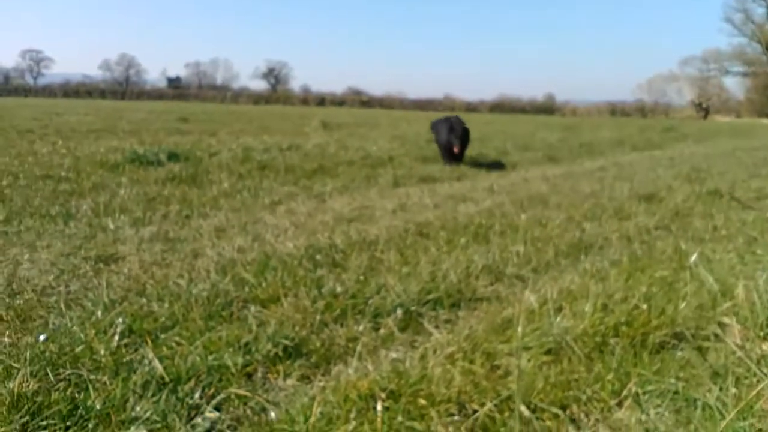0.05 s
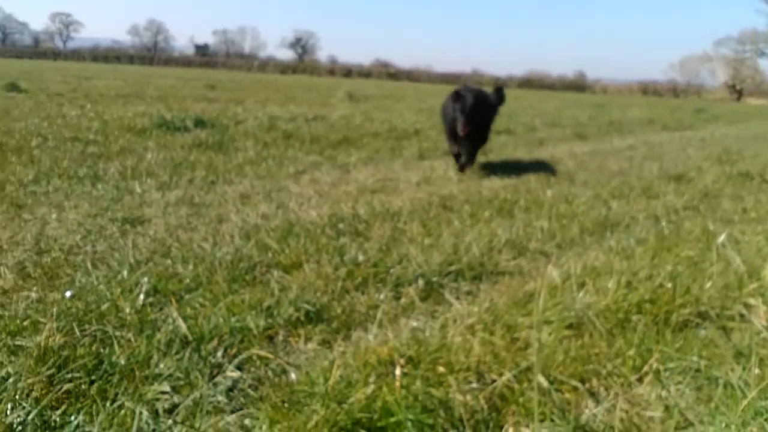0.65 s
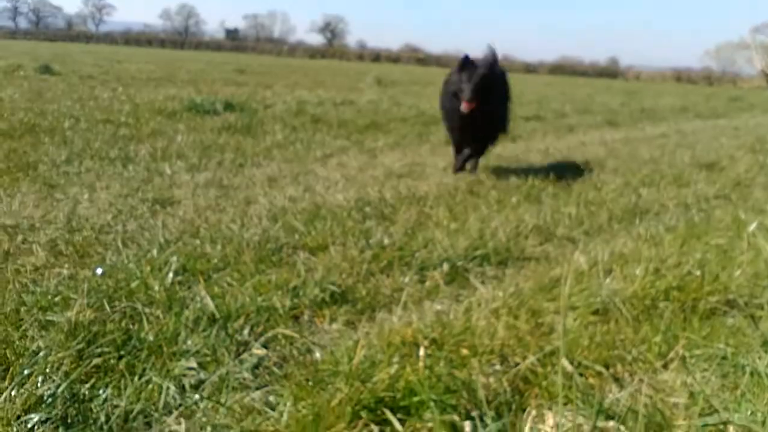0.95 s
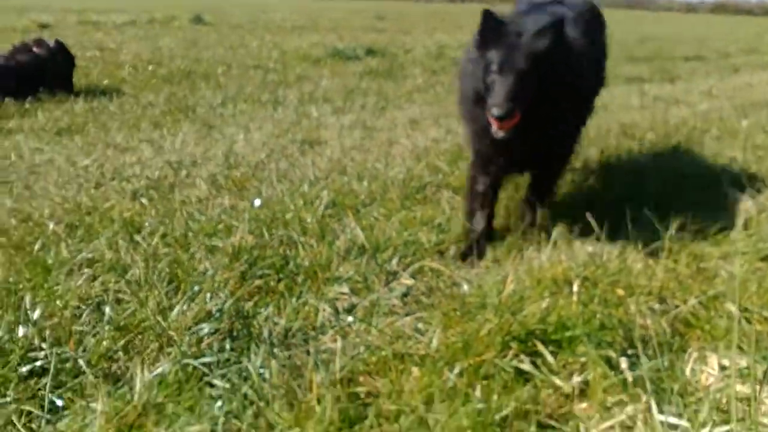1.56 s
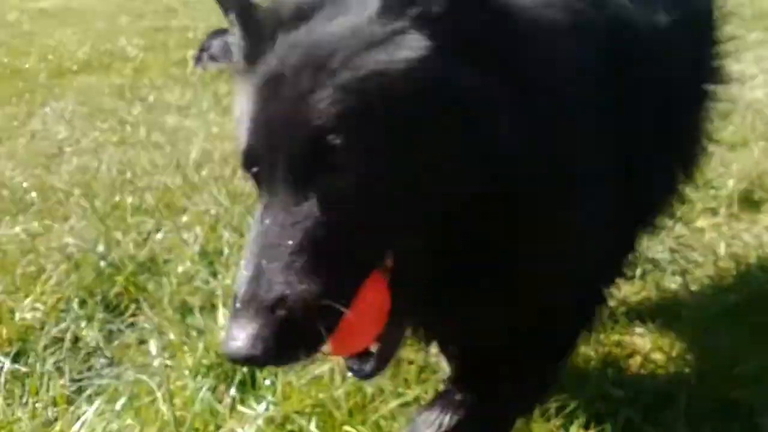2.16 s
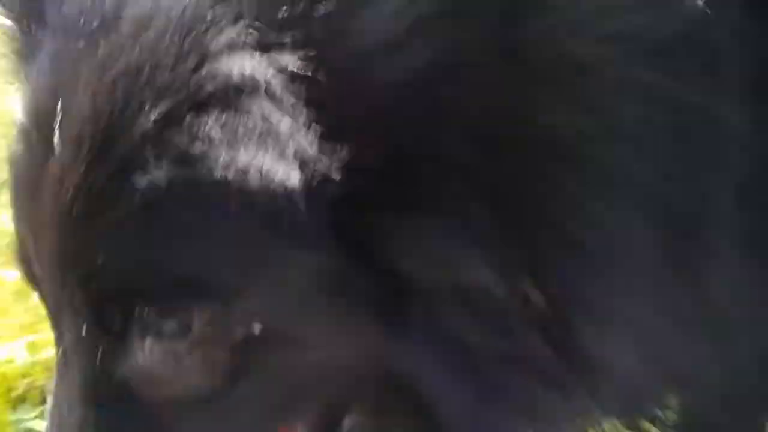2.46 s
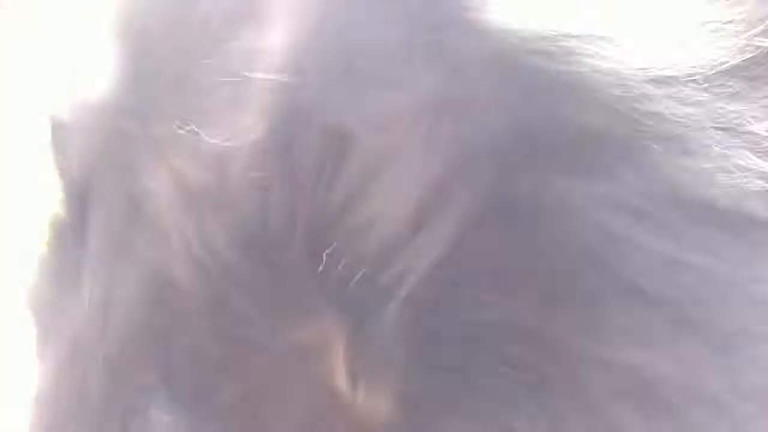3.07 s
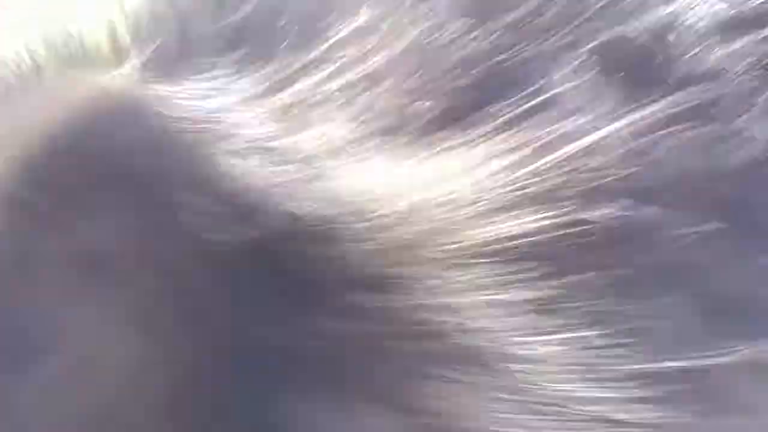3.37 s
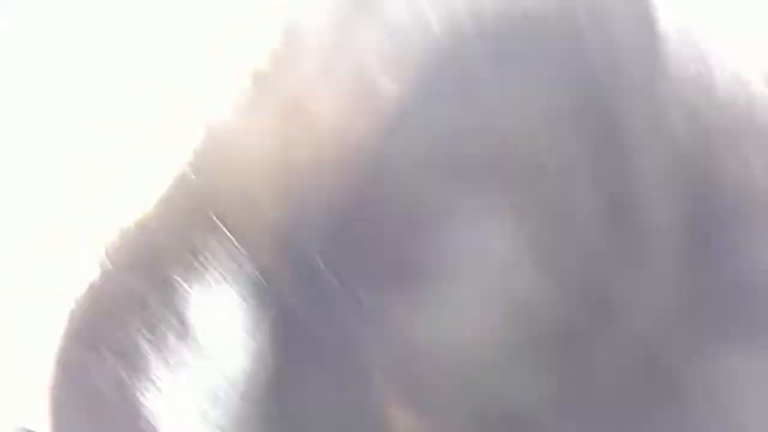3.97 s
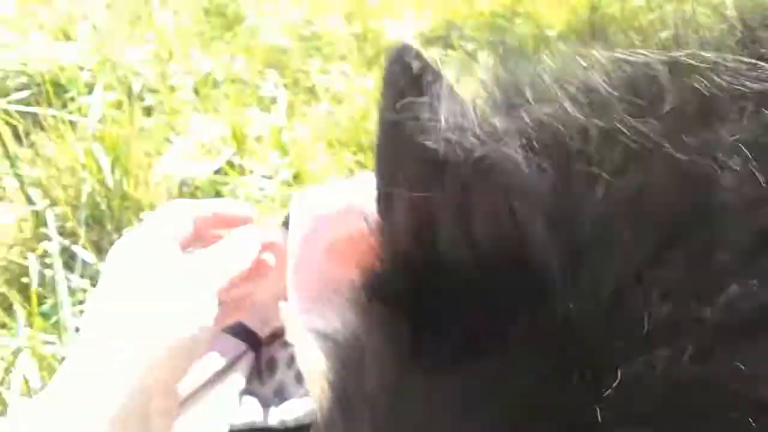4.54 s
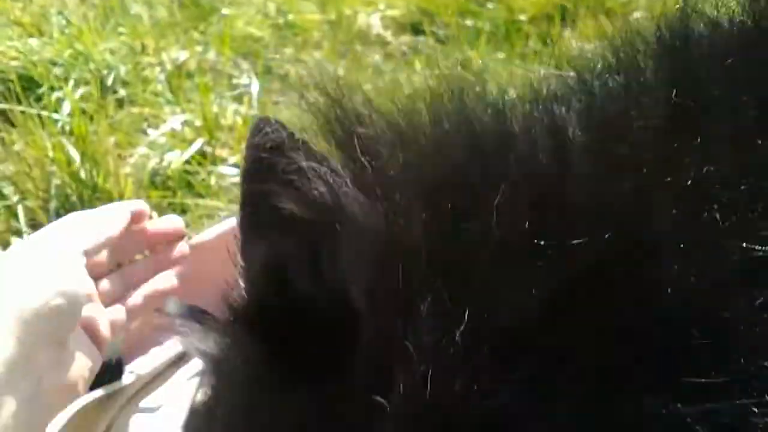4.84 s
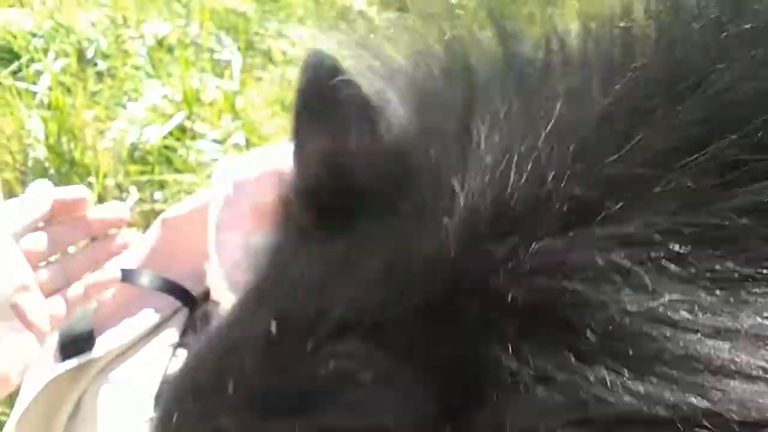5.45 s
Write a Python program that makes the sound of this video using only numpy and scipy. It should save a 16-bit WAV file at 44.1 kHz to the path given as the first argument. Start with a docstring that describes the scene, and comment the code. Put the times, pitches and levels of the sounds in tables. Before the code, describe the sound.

A light wind rumbles in a meadow under a fine, rustling hiss. During the first 0.7 seconds a dog gives several faint, short, high whimpers, with a few soft paw falls in the grass. At about 1.5 seconds its whimpers become much louder and closer, and at 1.8 seconds it gives one short, gruff bark. From 1.9 to 4.5 seconds comes a run of loud whines that climb, waver and crack into thin whistling squeals before falling away, the highest near 2.1, 2.5 and 4.4 seconds. From about 2.4 seconds to the end, fur rubs over the microphone with a low, lumpy rumble, mostly on the left, with faint breathy puffs from the dog. Dull bumps are strongest around 2.7, 2.9 and 4.8 seconds. A collar tag clinks on the left at 5 seconds, then ticks. A last whine and squeal follow at about 5.3 to 5.5 seconds.

```python
"""An eager dog in a meadow

A dog trots through grass over a light, rumbling wind. Its tight throat makes high, gliding
whines that break into whistles, and its slack vocal folds flap in one gruff bark.
It pushes up against the camera: fur rubs and bumps the microphone openings,
mostly the left one, and a collar tag clinks."""
import sys
import numpy as np
from scipy import signal
from scipy.fft import rfft, irfft, next_fast_len
from scipy.io import wavfile
from scipy.ndimage import uniform_filter1d, minimum_filter1d, map_coordinates

SR = 44100
rng = np.random.default_rng(int(sys.argv[2]) if len(sys.argv) > 2 else 0)


def unload_audio(sound):
    """Save the sound as a 16-bit wav file, at the path given as the first command line argument."""
    columns = np.transpose(np.atleast_2d(sound))
    # keep every value between -1 and 1, then stretch to whole-number steps
    steps = np.round(np.clip(columns, -1, 1) * 32767)
    wavfile.write(sys.argv[1], SR, steps.astype(np.int16))


N = 247401
TOP_HZ = 16200

# how the throat colours the voice: pitch_hz, level_db
THROAT = [(1900, -2.5), (2500, 0.5), (3200, -4.5), (3800, -2), (4400, -6.5), (5100, -5.5), (6200, -18.5),
          (7600, -15), (9500, -5), (11000, -16), (13000, -24.5), (15500, -19.5)]
# the two microphone openings hear differently: pitch_hz, left_over_right_db
MIC_BALANCE = [(1200, 0.5), (2000, 2.5), (3000, 8.5), (4800, 11.5), (6200, -1), (8000, -13), (10000, -13.5),
               (15000, -19.5)]


def amp(db):
    """Turn decibels into a gain."""
    return 10 ** (np.asarray(db) / 20)


def unit(x):
    """Scale to an average strength (rms) of 1."""
    return x / np.sqrt(np.mean(x ** 2) + 1e-20)


def along(points, hz):
    """Read (pitch_hz, value) points at hz, on a log scale of pitch."""
    pitches, values = np.transpose(points)
    return np.interp(np.log(hz + 1), np.log(pitches), values)


def curves(rows, t):
    """Read each column after the first (time_s) at the times t."""
    times, *columns = np.transpose(rows)
    return [np.interp(t, times, column) for column in columns]


def wobble(rate, size):
    """A smooth curve through `rate` random values a second."""
    return map_coordinates(rng.standard_normal(int(size * rate / SR) + 4), [np.arange(size) * rate / SR])


def filtered(x, response):
    """Scale each frequency in x by response(hz)."""
    size = x.shape[-1]
    padded = next_fast_len(size + 8192)
    return irfft(rfft(x, padded) * response(np.fft.rfftfreq(padded, 1 / SR)), padded)[..., :size]


def pan(balance_db):
    """Left and right gains with the same total power; positive leans left."""
    ratio = amp(np.atleast_1d(balance_db))
    return np.array([ratio, np.ones_like(ratio)]) * np.sqrt(2 / (1 + ratio ** 2))


def noise(colour, alike, size):
    """Stereo noise shaped by (pitch_hz, level_db) points; both sides have the share `alike` in common."""
    common = np.sqrt(alike) * rng.standard_normal(size)
    separate = np.sqrt(1 - alike) * rng.standard_normal((2, size))
    return unit(filtered(common + separate, lambda hz: amp(along(colour, hz))))


def at_mics(x):
    """Give a sound the colour of each microphone opening."""
    return filtered(x, lambda hz: pan(along(MIC_BALANCE, hz)))


def swell(t, middle_s, half_length_s):
    """A bell-shaped rise and fall."""
    return np.exp(-((t - middle_s) / half_length_s) ** 2)


def add(out, start_s, x):
    """Mix x into out from start_s on."""
    part = out[:, round(start_s * SR):][:, :x.shape[-1]]
    part += x[..., :part.shape[1]]


def wind(boost_db=2.0):
    """Wind buffets both microphone openings with a low rumble."""
    # wind strength: time_s, level_db
    strength = [(1.1, -58), (2.3, -50)]
    # wind colour: pitch_hz, level_db
    colour = [(25, -27.5), (60, 2), (110, -9), (200, -18), (400, -21), (1500, -40.5), (3000, -56.5)]
    level_db, = curves(strength, np.arange(N) / SR)
    return amp(level_db + boost_db) * noise(colour, 0.59, N) * pan(6.8)


def background_hiss(boost_db=1, grain_db=2.5):
    """A fine, grainy background hiss and rustle that briefly cuts out in quiet gaps."""
    # loudness of the hiss, with its brief dips: time_s, level_db
    loudness = [(0, -59), (0.68, -64.5), (0.76, -86), (0.92, -101), (0.96, -61.5), (1.06, -76), (1.11, -67),
                (1.48, -59), (1.77, -40), (2.56, -50), (2.68, -32), (2.9, -50), (3.2, -52), (3.45, -44),
                (4.28, -49), (4.68, -38), (4.88, -71), (5.13, -71), (5.29, -58), (5.61, -47.5)]
    # hiss colour: pitch_hz, level_db
    colour = [(290, -19), (500, -28), (819, -15), (880, -8.5), (1230, -11.5), (1340, -12.5), (1720, -8),
              (3440, -5.5), (5630, -9), (13800, -21), (16000, -25.5)]
    level_db, = curves(loudness, np.arange(N) / SR)
    grains = unit(amp(grain_db * wobble(600, N) + wobble(40, N)))
    return amp(level_db + boost_db) * grains * at_mics(noise(colour, 0.043, N))


def dog_note(start_s, pitch, level_db, lift_db, muzzle_hz, bright_db_per_octave, side_db,
             breath_db=-28, fade_s=0.0063, muzzle_db=14, muzzle_width_hz=430):
    """The vocal folds sing a base tone with overtones, turning rough where the pitch breaks."""
    # the voice is reedy when low, a whistle when high: pitch_hz, level_db, base_over_overtones_db
    register = [(1006, -3, -10.5), (1270, -2.54, -8.5), (1500, -1, -14), (1620, 0, -4.5), (1990, -5.7, 0),
                (2700, 0.4, 16.5), (3400, 0, 21.5), (3720, -1.5, 14), (4850, -1, -1.5), (5760, -8.5, 6.5),
                (5660, -8.5, 18.5)]
    # sound bends round the camera and reaches the left side later: pitch_hz, delay_ms
    left_delay = [(1400, 0.31), (2500, 0.52), (3400, 0.597), (5000, 0.4666)]
    # the dog comes round to the side: time_s, share_of_delay
    aside = [(2.0, 0.19), (2.6, 0.903)]
    size = len(pitch)
    t = start_s + np.arange(size) / SR
    pitch = uniform_filter1d(pitch, size=200, mode="nearest")
    register_hz, loud_db, purity_db = np.transpose(register)
    level = amp(level_db + np.interp(pitch, register_hz, loud_db))
    # lift_db shifts the balance towards the base tone, in the low voice only
    low_voice = np.clip((2400 - pitch) / 600, 0, 1)
    purity = amp(np.interp(pitch, register_hz, purity_db) + lift_db * low_voice)
    overtones = level / np.hypot(1, purity)
    glide = np.abs(np.gradient(np.log2(pitch))) * SR  # octaves a second
    breaking = np.abs(uniform_filter1d(np.clip(glide / 60, 0, 1) ** 2, size=300))
    jitter = .002 + .014 * np.sqrt(breaking)
    pitch = pitch * (1 + jitter * wobble(1400, size) + 1.6 * jitter * wobble(220, size))
    harmonics = np.arange(1, 17)[:, None]
    hz = harmonics * pitch
    # overtones swell as they sweep past the pitch at which the muzzle rings
    ring_db = muzzle_db / (1 + ((hz - muzzle_hz) / muzzle_width_hz) ** 2)
    colour_db = along(THROAT, hz) + bright_db_per_octave * np.log2(hz / 3000) + ring_db
    flicker_db = 2 * np.array([wobble(70, size) for _ in harmonics])
    gain = amp(colour_db + flicker_db) * (hz < TOP_HZ)
    gain *= overtones / np.sqrt(np.sum(gain[1:] ** 2, axis=0) + 1e-12)
    gain[0] = purity * overtones
    phase = harmonics * 2 * np.pi * np.cumsum(pitch) / SR + rng.uniform(0, 2 * np.pi, harmonics.shape)
    # on quick glides the high overtones fall out of step and smear into rasp
    smear = 3.5 * breaking ** .25 * np.clip(hz / 4000 - 1, 0, .5)
    phase += smear * np.array([wobble(600, size) for _ in harmonics])
    delay_s = curves(aside, t)[0] * along(left_delay, hz) / 1000
    balance_db = along(MIC_BALANCE, hz) + side_db * np.minimum(hz / muzzle_hz, 1)
    left, right = np.sqrt(2) * gain * pan(balance_db)
    voice = np.sum([left * np.sin(phase - 2 * np.pi * hz * delay_s), right * np.sin(phase)], axis=1)
    voice *= 1 + (0.009 + 0.38 * breaking) * wobble(1500, size)  # roughness
    voice *= 1 + (.11 + .35 * np.sqrt(breaking)) * wobble(150, size)  # slower flutter
    # air hisses through the tight throat, most at the breaks
    air = level * amp(breath_db + 5.6 * breaking) * at_mics(noise([(900, -39)] + THROAT, 0.72, size))
    fade = np.clip(np.minimum(t - t[0], t[-1] - t) / fade_s, 0, 1)
    return (voice + air) * np.sin(np.pi / 2 * fade) ** 2


def whimpers(scoop_share=0.16, scoop_s=0.005, droop_share=0.17, droop_s=0.01):
    """Short notes scoop up, dip a little in the middle and droop away."""
    # whimpers: start_s, length_s, pitch_hz, dip_share, level_db,
    # lift_db, muzzle_hz, bright_db_per_octave, side_db
    notes = [(0.044, 0.039, 1063, 0.005, -42.5, -4.5, 3230, -0.8, 6),
             (0.382, 0.084, 1144, 0.09, -39.5, -9.5, 2930, 2.5, -3.5),
             (0.636, 0.036, 1137, 0.0024, -38, -7, 2890, 1, -4.5),
             (1.507, 0.131, 1203, 0.1, -24, -4.5, 3110, -0.5, -1),
             (2.852, 0.029, 1110, 0.0034, -19, -6, 2900, -1, -1),
             (4.689, 0.035, 1117, 0.0068, -26, -0.5, 2370, 5.5, -3.5),
             (5.251, 0.043, 1099, 0.0017, -17.5, 10, 3300, -1, 3)]
    out = np.zeros((2, N))
    for start_s, length_s, pitch_hz, dip_share, level_db, *tone in notes:
        t = np.arange(0, length_s, 1 / SR)
        scoop = scoop_share * np.exp(-t / scoop_s)
        dip = dip_share * np.sin(np.pi * t / length_s)
        droop = droop_share * np.exp((t - length_s) / droop_s)
        add(out, start_s, dog_note(start_s, pitch_hz * (1 - scoop - dip - droop), level_db, *tone))
    return out


def meadow_echo(x, fade_s=0.05, echo_db=-15):
    """A faint, short echo scatters off the ground and the person holding the camera."""
    t = np.arange(SR // 4) / SR
    tail = rng.standard_normal((2, len(t))) * amp(-60 * t / fade_s) * (t > .003)
    return signal.fftconvolve(x, amp(echo_db) * tail / np.linalg.norm(tail[0]), axes=1)[:, :N]


def squeals(from_hz=1420, end_hz=1249, trail_db=-11.5, jerks=4, jerk_depth=0.9):
    """The voice leaps to its top, sags, falls in jerks and trails off."""
    # squeals: start_s, leap_s, hold_s, fall_s, tail_s, top_hz, sagged_hz, level_db,
    # lift_db, muzzle_hz, bright_db_per_octave, side_db
    notes = [(0.151, 0.0096, 0.017, 0.0023, 0.036, 1485, 1455, -43, 0, 3230, -2, 5),
             (0.508, 0.0079, 0.022, 0.0093, 0.032, 1505, 1470, -40.5, -2, 3130, 1.5, -3.5),
             (1.652, 0.017, 0.037, 0.012, 0.069, 1925, 1966, -19.5, 0.5, 3100, -1, 1.5),
             (2.056, 0.012, 0.12, 0.059, 0.038, 6060, 4850, -20.5, 5, 3000, 1, 3.5),
             (2.479, 0.012, 0.13, 0.043, 0.049, 6233, 4966, -16, 13.5, 2940, 1.3, 6),
             (3.297, 0.018, 0.025, 0.058, 0.056, 3450, 3277, -13.5, 4, 2670, -5, 4.5),
             (3.615, 0.019, 0.039, 0.021, 0.054, 2606, 2542, -20, 8, 2500, -3.7, -1.5),
             (3.947, 0.016, 0.046, 0.06, 0.043, 3830, 3860, -20, 3.5, 2930, 3, -1),
             (4.331, 0.0096, 0.1, 0.05, 0.024, 6150, 4810, -21, 1.5, 3020, 4, -0.5),
             (5.403, 0.016, 0.022, 0.071, 0.041, 3890, 3800, -21, 4, 3030, -1.5, 4.5)]
    out = np.zeros((2, N))
    for start_s, leap_s, hold_s, fall_s, tail_s, top_hz, sagged_hz, level_db, *tone in notes:
        t = np.arange(0, hold_s + fall_s + tail_s, 1 / SR)
        stages = [t / hold_s, (t - hold_s) / fall_s, (t - hold_s - fall_s) / tail_s]
        held, fallen, trailed = np.clip(stages, 0, 1)
        turn = 2 * np.pi * jerks
        jerky = fallen - jerk_depth * np.sin(turn * fallen) / turn
        # the pitch catches on a ledge, then lands in the low voice
        ledge_hz, land_hz = min(sagged_hz, 3760), min(sagged_hz, 1674)
        arch = np.interp(jerky, [0, 0.24, 0.42, 1], [sagged_hz, ledge_hz, ledge_hz, land_hz])
        arch += (top_hz - sagged_hz) * (1 - held ** 2.6) + (end_hz - land_hz) * trailed ** 0.93
        pitch = arch + (from_hz - arch) * swell(t, 0, leap_s)
        # the strained voice shakes and rasps on the way down
        strain = np.sin(np.pi * fallen)
        pitch *= 1 + 0.015 * strain * wobble(200, len(t))
        rasp = 1 + 0.25 * strain * wobble(900, len(t))
        add(out, start_s, rasp * dog_note(start_s, pitch, level_db + trail_db * trailed ** 2, *tone))
    return out


def paws(half_length_s=0.018):
    """Paws land in the grass with dull puffs."""
    # paw falls: middle_s, level_db
    steps = [(0.35, -64), (0.648, -53), (1.43, -59.5)]
    t = np.arange(N) / SR
    puffs = sum(amp(level_db) * swell(t, middle_s, half_length_s) for middle_s, level_db in steps)
    return puffs * noise([(80, 3.5), (200, -6), (380, 6), (700, -19.5), (2000, -42)], 0.38, N)


def breaths_and_brushes():
    """The dog's breathy puffs and snorts, and brushes through grass: swells of hiss around one pitch."""
    # swells of hiss: middle_s, half_length_s, level_db, pitch_hz, width_hz
    swells = [(0.974, 0.026, -62.5, 2600, 900), (1.303, 0.23, -67, 4500, 1000),
              (2.769, 0.061, -39.5, 1120, 358), (3.785, 0.031, -43.5, 2770, 500),
              (4.634, 0.12, -41.5, 3620, 905), (4.788, 0.025, -45.5, 1360, 300)]
    out = np.zeros((2, N))
    for middle_s, half_length_s, level_db, pitch_hz, width_hz in swells:
        t = np.arange(-2 * half_length_s, 2 * half_length_s, 1 / SR)
        hiss = rng.standard_normal(len(t))
        band = unit(filtered(hiss, lambda hz: 1 / (1 + ((hz - pitch_hz) / width_hz * 1.67) ** 4)))
        puff = amp(level_db) * swell(t, 0, half_length_s) * band
        add(out, middle_s + t[0], puff * pan(along(MIC_BALANCE, pitch_hz)))
    return out


def bark(flap_hz=122, ring_db=-3, rasp_db=-3, chest_db=-13):
    """Slack vocal folds flap unevenly; each puff rings the throat while the chest hums along."""
    # course of the bark: time_s, level_db, throat_hz
    course = [(1.775, -64.5, 1000), (1.784, -26.5, 1003), (1.8, -21.5, 1246), (1.825, -20.5, 1152),
              (1.849, -22, 1019), (1.859, -31, 1057), (1.878, -42, 1140)]
    # rasp colour: pitch_hz, level_db
    colour = [(53, -50), (90, -4.5), (556, -14.5), (1240, -8), (1540, -21), (3830, -7), (6160, -25.5),
              (6720, -22), (16000, -28)]
    t = np.arange(course[0][0], course[-1][0], 1 / SR)
    size = len(t)
    level_db, throat_hz = curves(course, t)
    cycles = np.cumsum(flap_hz * (1 + 0.14 * wobble(150, size))) / SR
    puffs = unit(uniform_filter1d(1.1 + np.exp(-3 * (cycles % 1)), size=30))
    ring = amp(ring_db) * unit(np.sin(2 * np.pi * np.cumsum(throat_hz) / SR + 1.7 * wobble(250, size)))
    rasp = amp(rasp_db) * at_mics(noise(colour, 0.87, size))
    chest = amp(chest_db) * unit(np.sin(2 * np.pi * cycles) + 0.88 * np.sin(4 * np.pi * cycles))
    out = np.zeros((2, N))
    add(out, t[0], amp(level_db) * (puffs * (ring + rasp) + chest))
    return out


def whines():
    """Long notes at a steady effort climb, waver and collapse."""
    # one tune per whine, each a list of: time_s, pitch_hz
    tunes = [
        [(1.872, 1083), (1.886, 1221), (1.924, 1330), (1.94, 1615), (1.954, 1614), (1.964, 1390), (1.974, 1630),
         (1.988, 1600), (1.996, 1243), (2.008, 1616), (2.026, 1220), (2.05, 1067)],
        [(2.304, 1110), (2.316, 1223), (2.336, 1252), (2.352, 1697), (2.376, 2110), (2.384, 1604),
         (2.414, 1925), (2.43, 1980), (2.446, 2200), (2.454, 2111), (2.464, 1603), (2.475, 1475)],
        [(3.176, 1050), (3.188, 1183), (3.222, 1211), (3.244, 1720), (3.26, 1767), (3.272, 1214), (3.286, 1020)],
        [(3.528, 1120), (3.558, 1356), (3.57, 1630), (3.586, 1712), (3.592, 1510), (3.605, 1000)],
        [(3.833, 1097), (3.865, 1255), (3.879, 1403), (3.887, 1732), (3.905, 1716), (3.913, 1952),
         (3.927, 1927), (3.933, 1619), (3.941, 1185), (3.945, 982)],
        [(4.178, 1111), (4.202, 1420), (4.21, 1732), (4.226, 2095), (4.234, 1605), (4.25, 1784), (4.262, 1673),
         (4.276, 1886), (4.294, 1680), (4.306, 1826), (4.327, 1306)],
        [(5.298, 970), (5.306, 1037), (5.33, 1068), (5.356, 1258), (5.38, 1960), (5.39, 1920), (5.404, 1055)],
    ]
    # tone of each whine: level_db, lift_db, muzzle_hz, bright_db_per_octave, side_db
    tones = [(-14, -9, 3150, -0.35, -1.5), (-14.5, -7, 3170, -2, 3), (-19, -1, 2500, -1, 3.5),
             (-17.5, -3, 2580, -4, 4), (-19, -3, 3105, 1.2, -2), (-18, -7.5, 3000, -1, -4.5),
             (-20, 8, 3340, -0.5, 0.5)]
    out = np.zeros((2, N))
    for tune, tone in zip(tunes, tones):
        t = np.arange(tune[0][0], tune[-1][0], 1 / SR)
        add(out, t[0], dog_note(t[0], curves(tune, t)[0], *tone))
    return out


def voice_cracks(half_length_s=0.0096):
    """The vocal folds lose their rhythm for a moment and spit noise through the throat."""
    # hoarse cracks: middle_s, level_db
    cracks = [(2.065, -26), (2.187, -36), (2.474, -24.5), (2.622, -32), (3.934, -24), (4.325, -23),
              (4.44, -43.5), (5.402, -41.5)]
    t = np.arange(N) / SR
    bursts = sum(amp(level_db) * swell(t, middle_s, half_length_s) for middle_s, level_db in cracks)
    return bursts * at_mics(noise([(900, -39.5)] + THROAT, 0.26, N))


def coat_rub(touch_s=2.34, resting_db=-47.5, boost_db=0.5, lumps_db=3, slips_db=-12):
    """The coat comes to rest on the camera and drags in lumps over the left opening."""
    # shoves of the coat: middle_s, half_length_s, level_db
    shoves = [(2.517, 0.017, -34.5), (2.727, 0.085, -23), (2.915, 0.06, -29), (2.999, 0.11, -29),
              (3.28, 0.1, -34.5), (3.44, 0.14, -37.5), (3.77, 0.093, -36), (3.915, 0.043, -33.5),
              (4.111, 0.032, -27), (4.212, 0.11, -35.5), (4.442, 0.083, -35), (4.697, 0.21, -34.5),
              (4.975, 0.052, -30), (5.075, 0.032, -37), (5.3, 0.03, -45), (5.616, 0.084, -30.5)]
    # colour of the rubbed case: pitch_hz, level_db
    case_colour = [(25, -32), (55, 3.5), (105, 4), (250, -9), (470, -35.5), (750, -64), (2000, -62.5)]
    t = np.arange(N) / SR
    resting = amp(resting_db) * np.clip((t - touch_s) / 0.15, 0, 1)
    shove_power = sum((amp(db) * swell(t, middle_s, half_s)) ** 2 for middle_s, half_s, db in shoves)
    pressure = np.sqrt(resting ** 2 + shove_power)
    drag = unit(noise(case_colour, 0.44, N) * amp(lumps_db * wobble(30, N)))
    # tufts catch and slip: spiky scuffs in the hollow of the case
    hollow = noise([(120, -25), (300, 0), (480, 0), (900, -15), (2000, -45)], .6, N)
    slips = unit(hollow * amp(5.5 * wobble(90, N)))
    return amp(boost_db) * pressure * (drag * pan(14) + amp(slips_db) * slips * pan(17))


def bumps(fade_s=0.05, rise_s=0.0012, boost_db=1, scuff_db=-10):
    """Soft blows make the camera's case ring briefly, with a dull scuff."""
    # blows: start_s, level_db, pitch_hz
    blows = [(2.726, -21, 476), (2.768, -44, 199), (2.925, -19, 211), (3.018, -42, 197), (3.126, -29, 388),
             (3.459, -31, 406), (3.697, -28.5, 448), (3.713, -27, 334), (3.786, -28, 406),
             (4.121, -26, 248), (4.48, -26, 342), (4.68, -25.5, 431), (4.752, -25, 244.5),
             (4.773, -15.5, 474), (5.171, -25.5, 373)]
    scuff_colour = [(100, 3.5), (500, -4.0), (800, -5), (1300, -16.5), (2200, -61), (8000, -33.5)]
    out, t = np.zeros((2, N)), np.arange(SR // 8) / SR
    shape = amp(-60 * t / fade_s) * (1 - np.exp(-t / rise_s))
    for start_s, level_db, pitch_hz in blows:
        ring = np.sin(2 * np.pi * pitch_hz * t + 0.36 * wobble(170, len(t)))
        scuff = amp(scuff_db) * noise(scuff_colour, 0.12, len(t))
        add(out, start_s, amp(level_db + boost_db) * (ring + scuff) * shape * pan(4.5))
    return out


def collar_tag():
    """The collar tag rings once, then ticks."""
    # clinks: start_s, level_db, pitch_hz, fade_s (time to drop 60 dB)
    clinks = [(4.997, -24, 5330, 0.062), (5.188, -24.5, 4770, 0.002)]
    out, t = np.zeros((2, N)), np.arange(SR // 8) / SR
    for start_s, level_db, pitch_hz, fade_s in clinks:
        ring = np.sin(2 * np.pi * pitch_hz * t + .4 * wobble(300, len(t)))
        shape = amp(-60 * t / fade_s) * (1 - np.exp(-30 * t / fade_s))
        add(out, start_s, amp(level_db) * ring * shape * pan(20))
    return out


def scene():
    """The dog's voice and its echo, over wind, hiss, rubbing and knocks."""
    dog = whimpers() + whines() + squeals() + voice_cracks() + amp(-1.0) * bark()
    voice = dog + meadow_echo(dog)
    airy = background_hiss() + breaths_and_brushes() + wind()
    return voice + airy + coat_rub() + paws() + bumps() + collar_tag()


def record(dry, ceiling=0.29):
    """The camera turns loud peaks down and keeps nothing above TOP_HZ."""
    needed = np.minimum(1, ceiling / (np.abs(dry).max(axis=0) + 1e-9))
    gain = uniform_filter1d(minimum_filter1d(needed, size=200), size=150)
    return filtered(dry * gain, lambda hz: hz < TOP_HZ)


dry = scene()
out = record(dry)
unload_audio(out)
```